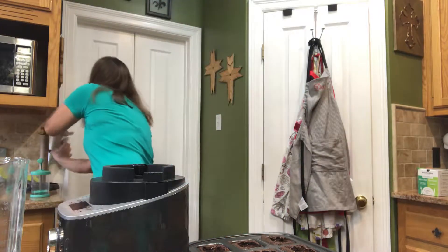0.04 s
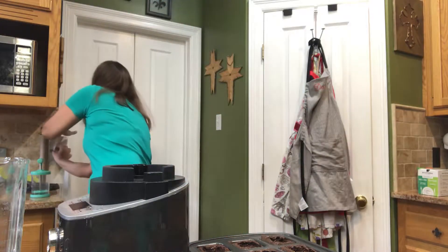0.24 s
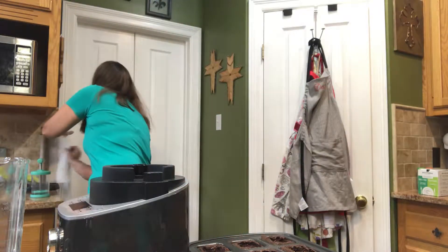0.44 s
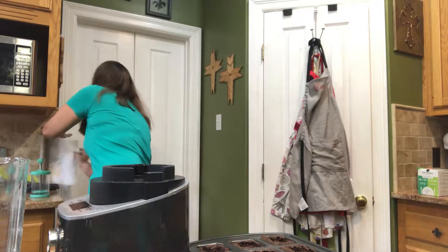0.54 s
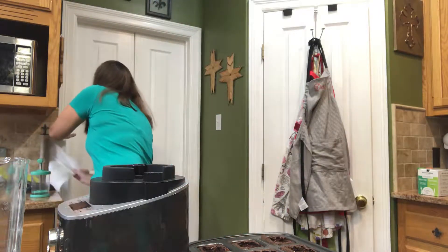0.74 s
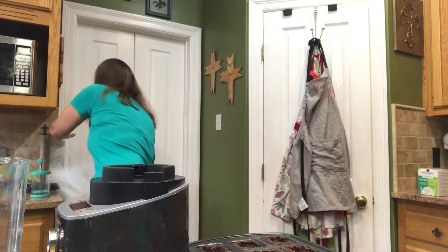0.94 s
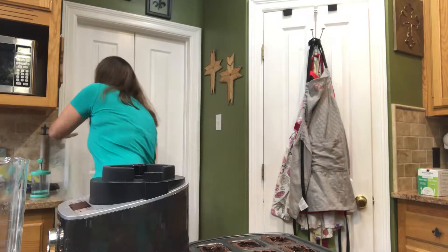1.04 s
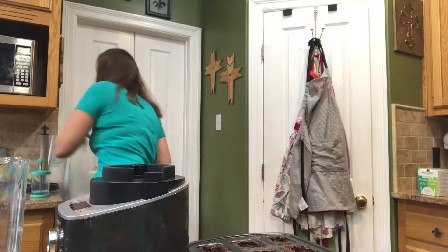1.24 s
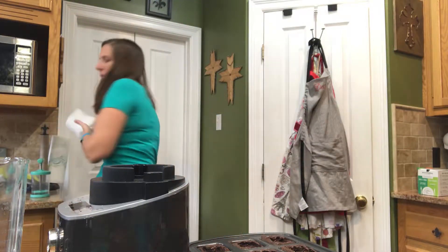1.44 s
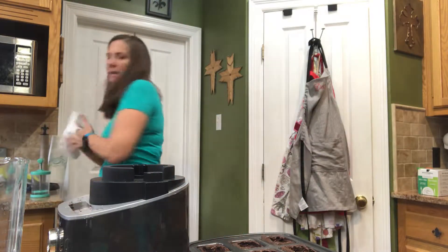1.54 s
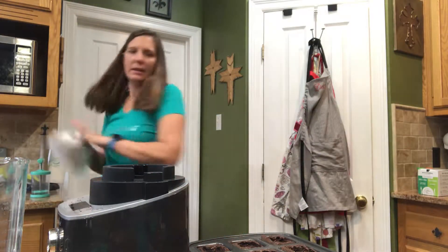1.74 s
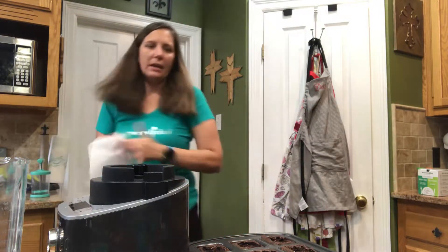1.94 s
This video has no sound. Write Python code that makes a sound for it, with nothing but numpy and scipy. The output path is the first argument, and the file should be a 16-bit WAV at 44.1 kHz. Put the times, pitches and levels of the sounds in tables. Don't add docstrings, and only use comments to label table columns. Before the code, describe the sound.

A paper towel is torn from its roll in a quiet kitchen. Faint rustles and soft hollow cardboard notes come first, with crinkling building from about 0.4 seconds. At 0.76 a sharp snap starts a rough, sputtering rip that fades by 1.0, the roll shuddering low. Loose paper rustles, then crumples with small crackles from 1.4 to the end, over low room murmur and refrigerator hum.

```python
import sys
import numpy as np
from scipy import signal
from scipy.fft import rfft, irfft
from scipy.io import wavfile
from scipy.ndimage import uniform_filter1d

SR = 44100
rng = np.random.default_rng(int(sys.argv[2]) if len(sys.argv) > 2 else 0)


def master(y):
    cut = np.clip(np.atleast_2d(y).T, -1, 1)
    pcm = np.round(cut * 32767)
    wavfile.write(sys.argv[1], SR, pcm.astype(np.int16))


def to_linear_factor(level_db):
    exponent = np.asarray(level_db, float) / 20
    return 10 ** exponent


N = 88200
T = np.arange(N) / SR

# (t/s, crack level/dB, ring f/Hz, ring length/s, ring level/dB)
BRIDGES = [(.7609, -18, 945, .0135, -28), (.768, -27, 3600, .003, -34), (.7925, -28, 1900, .004, -33),
           (.794, -32, 1250, .003, -30), (.801, -34, 930, .010, -30), (.8085, -32, 900, .0025, -28),
           (.823, -34, 900, .006, -32), (.8375, -27, 750, .006, -26), (.843, -30, 920, .007, -26),
           (.850, -34, 700, .006, -31), (.8535, -32, 750, .003, -29), (.861, -33, 1400, .005, -34),
           (.869, -32, 880, .005, -30), (.884, -34, 650, .004, -33), (.8885, -25, 1640, .003, -23),
           (.893, -36, 520, .004, -33), (.897, -34, 870, .005, -31), (.907, -32, 1300, .003, -32),
           (.9155, -34, 870, .008, -28), (.9325, -32, 620, .003, -25), (.9405, -30, 800, .003, -29),
           (.949, -34, 720, .008, -29), (.954, -34, 720, .003, -31), (.961, -38, 740, .008, -31),
           (.982, -40, 750, .003, -34)]
# (f/Hz, level per Hz/dB)
SLACK_TONE = [(150, -2.5), (400, -4), (1000, -1.5), (1600, -1), (3500, -8), (6500, -13), (9000, -23),
              (15500, -34)]


def evened(x):
    return x / np.sqrt(np.mean(x ** 2) + 1e-20)


def read(points, hz):
    f, value = np.transpose(points)
    return np.interp(np.log(hz + 1), np.log(f + 1), value)


def colour(x, db_of):
    gain_db = np.maximum(db_of(abs(np.fft.fftfreq(8192, 1 / SR))), -100)
    log_gain = np.log(to_linear_factor(gain_db))
    taps = np.fft.ifft(np.exp(np.conj(signal.hilbert(log_gain)))).real[:4096]
    return signal.fftconvolve(x, taps / np.linalg.norm(taps))[:len(x)]


def resonate(x, hz, width_hz):
    turn = np.exp(2j * np.pi * np.cumsum(hz * np.ones(len(x))) / SR)
    r = np.exp(-np.pi * width_hz / SR)
    return 2 * (turn * signal.lfilter([1 - r], [1, -r], x / turn)).real


def clicks(per_s, spread_db):
    hit = rng.random(N) < per_s / SR
    size = np.minimum(rng.exponential(1, N), 4)
    return evened(hit * to_linear_factor(spread_db * size) * rng.standard_normal(N))


def wander(size):
    return evened(uniform_filter1d(uniform_filter1d(rng.standard_normal(N), size), size))


def creases(per_s, spread_db):
    borders = [400, 800, 1500, 2600, 4200, 6500, 10000]
    hz = np.fft.rfftfreq(N, 1 / SR)
    edges = [0] + list(borders) + [SR]
    spectrum = 0
    for k in range(len(edges) - 1):
        train = clicks(per_s * (1 + k) / 2, spread_db) * to_linear_factor(1.3 * wander(size=700))
        spectrum = spectrum + rfft(train) * (hz >= edges[k]) * (hz < edges[k + 1])
    return evened(irfft(spectrum, N))


def rip():
    # (t/s, force level/dB, sheet pitch f/Hz)
    pull = [
        (0.74, -49, 960),
        (0.752, -47, 946),
        (0.764, -31, 960),
        (0.782, -42, 890),
        (0.808, -33, 870),
        (0.813, -34, 890),
        (0.836, -39, 860),
        (0.95, -39, 714),
        (1.0, -61, 742),
    ]
    # (f/Hz, level per Hz/dB)
    fibre_tone = [(80, -7), (250, 4.5), (450, -3.5), (750, 1), (1600, -3), (2600, -6.5), (4500, -17),
                  (15500, -28)]
    # (share of pitch, width f/Hz, level/dB)
    sheet_modes = [(1.04, 260, -3), (.8, 200, -4), (1.45, 250, -6), (1.9, 250, -7)]
    s, force_db, pitch_hz = np.transpose(pull)
    gate = np.clip((T - BRIDGES[0][0]) / 0.011, 0, 1) * np.clip((s[-1] - T) / 0.075, 0, 1)
    force = gate * to_linear_factor(np.interp(T, s, force_db) - 3.5)
    hz = np.interp(T, s, pitch_hz)
    drive = creases(per_s=2500, spread_db=4) * to_linear_factor(2.3 * wander(size=120))
    fibres = colour(drive, lambda f: read(fibre_tone, f))
    sheet = sum(to_linear_factor(db) * evened(resonate(drive, share * hz, width)) for share, width, db in sheet_modes)
    return force * (to_linear_factor(-0.5) * fibres + to_linear_factor(-12.0) * sheet)


def snap(s, crack_db, hz, length, ring_db):
    # (f/Hz, level per Hz/dB)
    crack_tone = [(300, -16.5), (900, -6), (1700, 2), (2200, -5.5), (3600, -6.5), (4600, -16),
                  (6000, -14.5), (15500, -43)]
    sag = 0.069
    begun = T >= s
    age = np.maximum(T - s, 0)
    burst = colour(rng.standard_normal(N), lambda f: read(crack_tone, f))
    crack = to_linear_factor(crack_db - 9.5 - 60 * age / 0.035) * begun * burst
    rise = np.minimum(age / min(0.0031, length / 3), 1)
    swell = rise * to_linear_factor(ring_db - 1.5 - 20.0 * (age / length) ** 4)
    pitch = hz * (1 + sag * (.5 - np.minimum(age / length, 1)))
    return crack + swell * np.sin(2 * np.pi * np.cumsum(pitch * begun) / SR)


def rustle():
    # (t/s, rustle level/dB, stiffness 0-1, sliding level/dB)
    hands = [
        [(0.0, -72, 0.24, -16), (0.158, -66, 0.1, -8), (0.266, -56, 0.13, -14), (0.322, -62.5, 0.66, -9),
         (0.338, -64, 0.1, -22), (0.35, -66, 0.1, -22)],
        [(0.36, -58.5, 0.06, -12), (0.4, -53, 0.37, -13), (0.462, -51.5, 0.71, -4), (0.57, -52.5, 0.62, -1),
         (0.636, -53, 0.38, -12), (0.75, -47.5, 0.43, -13)],
        [(0.98, -49.5, 0.6, -6), (1.07, -56, 0.08, -30), (1.14, -57, 0, -12), (1.198, -62.5, 0.1, -25),
         (1.24, -57.5, 0.13, -16), (1.375, -66, 0.3, -12)],
        [(1.385, -54.5, 0.1, -16), (1.395, -54.5, 0, -16), (1.455, -55.5, 0.2, -12), (1.463, -53, 0.25, -10.5),
         (1.62, -56, 0.53, -15)],
        [(1.64, -57, 0.6, -13.5), (1.798, -57.5, 0.97, -8.5), (1.868, -64.5, 0.95, -11),
         (1.894, -59.5, 0.4, -23), (1.93, -61.5, 0.57, -7), (2.0, -50.5, 0.57, -14)],
    ]
    # (f/Hz, level per Hz/dB)
    crisp_tone = [(200, -14.5), (600, -12), (1700, -3), (3700, -1.5), (6200, -5.5), (8500, -13.5),
                  (11000, -22), (15500, -31.5)]
    brush_tone = [(4000, -34), (7000, 0.5), (9000, 0.5), (10500, 2), (13000, 0.5), (15500, -1.5)]
    s, *moves = np.concatenate(hands).T
    level_db, stiff, slide_db = (np.interp(T, s, move) for move in moves)
    drive = creases(per_s=4300, spread_db=0) * to_linear_factor(0.1 * wander(size=250))
    slack = colour(drive, lambda hz: read(SLACK_TONE, hz))
    crisp = colour(drive, lambda hz: read(crisp_tone, hz))
    slide = to_linear_factor(slide_db - 2.0) * colour(clicks(15000, 1.1), lambda hz: read(brush_tone, hz))
    return to_linear_factor(level_db + 1.5) * ((1 - stiff) * slack + stiff * crisp + slide)


def crackle():
    # (t/s, peak level/dB)
    folds = [(0.2404, -66), (0.2646, -38), (0.3987, -32), (0.4124, -39), (0.4654, -30.5), (0.481, -30.5),
             (0.576, -27), (1.39, -30), (1.406, -28.5), (1.4244, -49), (1.457, -31.5), (1.4844, -35),
             (1.575, -35), (1.7833, -55), (1.971, -36)]
    swell = 0
    for s, db in folds:
        swell = swell + np.clip((T - s) / 0.0099, 0, 1) * to_linear_factor(db - 14 - 60 * abs(T - s) / 0.067)
    return colour(swell * clicks(11000, 1.3), lambda hz: read(SLACK_TONE, hz))


def hollow(s, length, hz, db, fuzz):
    breathy = evened(resonate(clicks(3000, 2), hz, width_hz=.22 * hz))
    clear = np.sqrt(2) * np.sin(2 * np.pi * hz * T)
    swell = np.sqrt(abs(np.sin(np.pi * np.clip((T - s) / length, 0, 1))))
    return to_linear_factor(db) * swell * ((1 - fuzz) * clear + fuzz * breathy)


def core():
    # (t/s, length/s, f/Hz, level/dB, fuzz 0-1)
    hollow_notes = [(.006, .055, 1335, -66, .15), (.08, .06, 920, -63, .55), (.108, .07, 1310, -65, .3),
                    (.125, .04, 840, -62, .5), (.23, .03, 1420, -59, .6), (.24, .07, 950, -59, .55),
                    (.372, .055, 930, -61, .3), (.462, .035, 1750, -57, .8), (.582, .04, 980, -58, .45),
                    (.66, .05, 1450, -56, .9), (.695, .065, 1000, -56, .6), (.98, .016, 1680, -50, .4),
                    (1.0, .04, 1200, -50, .8), (1.024, .018, 900, -48, .4), (1.045, .025, 830, -47, .3),
                    (1.074, .025, 1250, -55, .6), (1.08, .06, 850, -56, .9), (1.385, .05, 700, -56, 1),
                    (1.42, .02, 330, -51, .3), (1.39, .025, 230, -54, .5), (1.46, .05, 600, -58, 1),
                    (1.508, .02, 1830, -59, .5), (1.562, .022, 260, -56, .5)]
    return sum(hollow(*row) for row in hollow_notes)


def thrum():
    s, hz, level_db = .84, 139, -43.5
    gate = np.clip((T - s) / 0.0087 + 1, 0, 1) * np.clip((s + 0.2 - T) / 0.031, 0, 1)
    return gate * to_linear_factor(level_db - 60 * abs(T - s) / 1.2) * np.sin(2 * np.pi * hz * T)


def tail():
    # (f/Hz, 60 dB decay time/s)
    decay = [(150, 0.57), (700, 0.32), (2000, 0.32), (6000, 0.23), (14000, 0.22)]
    taps = np.zeros(SR // 2)
    at = np.arange(200, len(taps) - 10, 10)
    taps[at + rng.integers(0, 10, len(at))] = rng.choice([-1., 1.], len(at))
    hz, t, z = signal.stft(taps, SR, nperseg=256)
    out = signal.istft(z * to_linear_factor(-60 * t / read(decay, hz)[:, None]), SR, nperseg=256)[1]
    return out / np.linalg.norm(out)


def kitchen(x):
    turns = [np.sqrt(2 / 3) * np.cos(2 * np.pi * (9 * T + k / 3)) for k in range(3)]
    return sum(signal.fftconvolve(x * turn, tail())[:N] for turn in turns)


def air():
    # (f/Hz, level per Hz/dB)
    murmur_tone = [(15, 1), (25, -9), (75, 8), (281, -0.5), (782, -11.5), (1340, -9.5), (1950, -26.5),
                   (3260, -21), (15500, -33.5)]
    # (f/Hz, level/dB)
    hum_notes = [
        (59, -67.5),
        (120, -77.5),
        (240, -68),
        (284, -69.5),
    ]
    hum = 0
    for hz, db in hum_notes:
        level = to_linear_factor(db + 2.4 * wander(size=4000))
        hum = hum + level * np.sin(2 * np.pi * (hz * T + 0.19 * wander(size=5000)))
    murmur = colour(rng.standard_normal(N), lambda hz: read(murmur_tone, hz))
    return hum + to_linear_factor(-58.5 + 0.5 * wander(size=1500)) * murmur


def scene():
    paper = rip() + sum(snap(*row) for row in BRIDGES) + rustle() + crackle() + core()
    return (paper + to_linear_factor(-5) * kitchen(paper) + thrum() + air())[None]


def top_cut(x):
    return signal.sosfilt(signal.butter(12, 15800, fs=SR, output="sos"), x)


def record(dry):
    # (f/Hz, width f/Hz, level/dB)
    dips = [
        (2060, 63, -1),
        (4970, 140, -5.5),
        (8330, 250, -2),
        (10360, 390, -5.5),
    ]
    heard = colour(dry[0], lambda hz: sum(db / (1 + ((hz - f) / w) ** 2) for f, w, db in dips))
    heard = signal.sosfilt(signal.butter(3, 45, "high", fs=SR, output="sos"), heard)
    low_pass = signal.firwin(511, 15750, window=("kaiser", 9), fs=SR)
    heard = signal.oaconvolve(heard, low_pass, "same")
    return top_cut(heard[None])


dry = scene()
out = record(dry)
master(out)
```